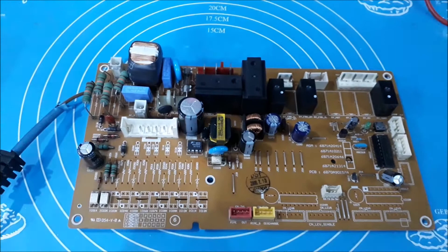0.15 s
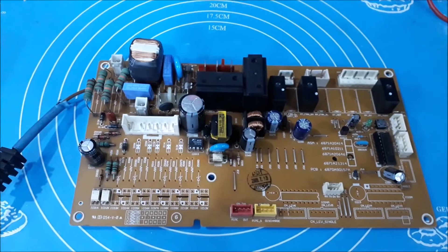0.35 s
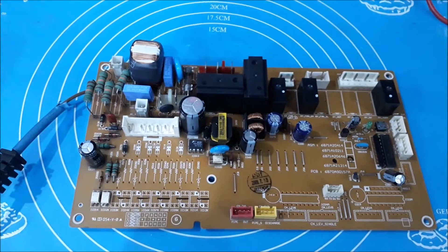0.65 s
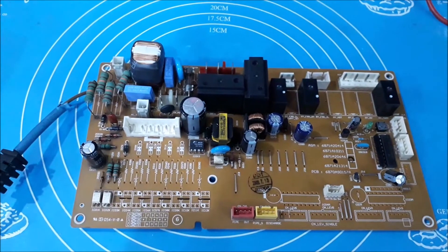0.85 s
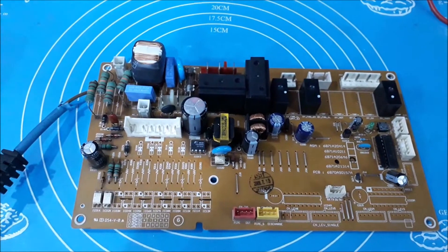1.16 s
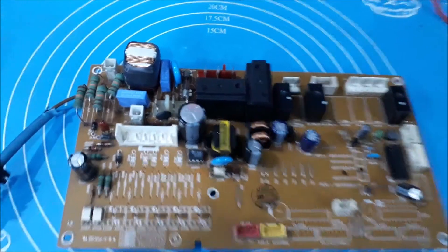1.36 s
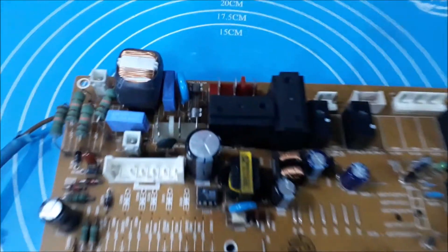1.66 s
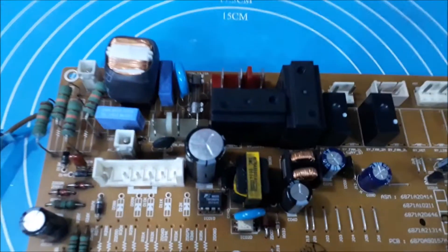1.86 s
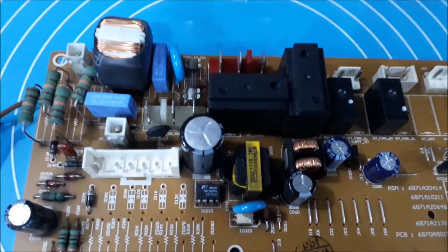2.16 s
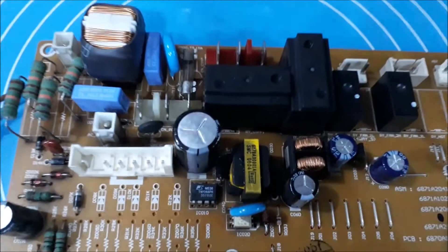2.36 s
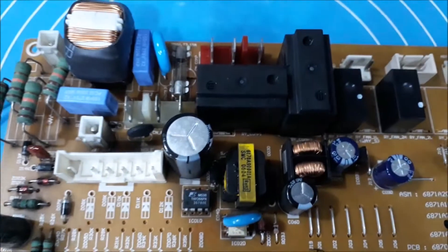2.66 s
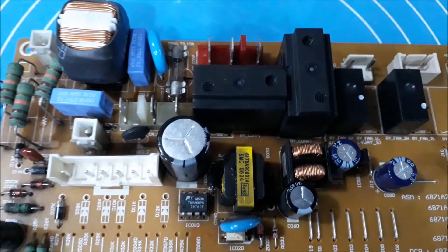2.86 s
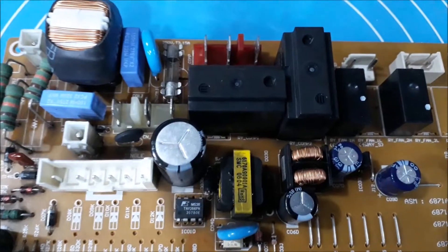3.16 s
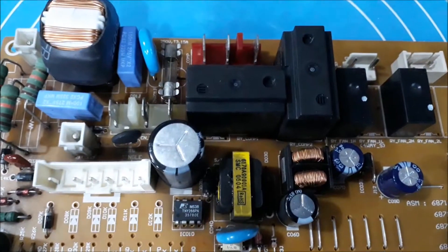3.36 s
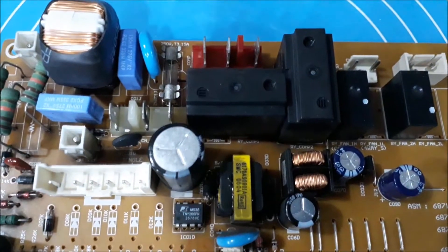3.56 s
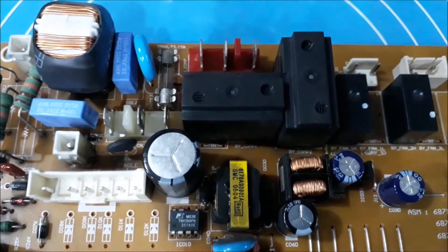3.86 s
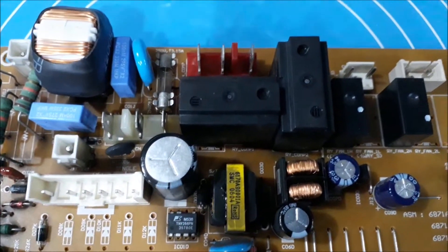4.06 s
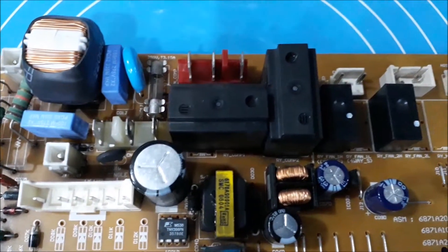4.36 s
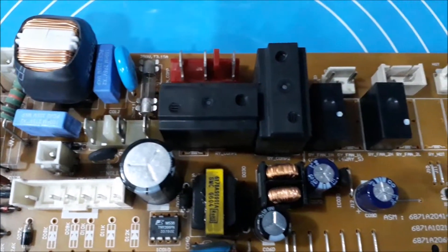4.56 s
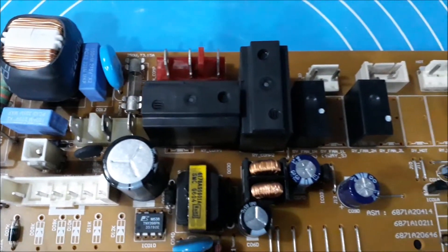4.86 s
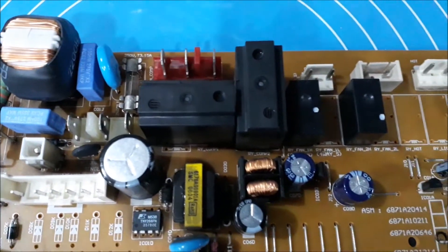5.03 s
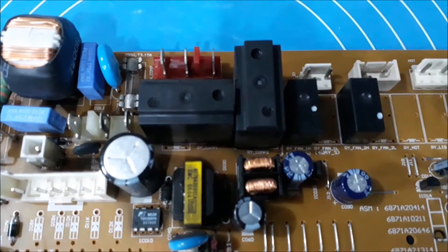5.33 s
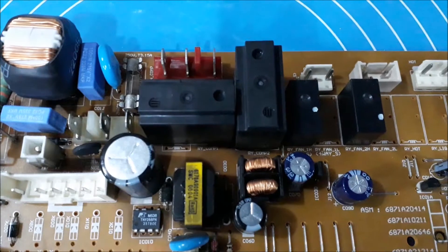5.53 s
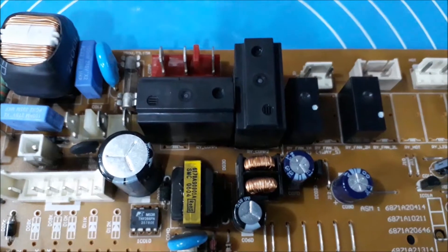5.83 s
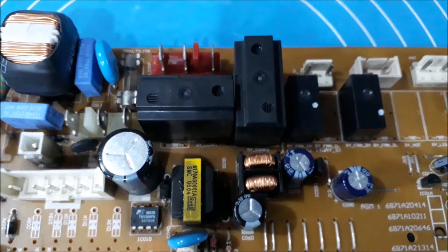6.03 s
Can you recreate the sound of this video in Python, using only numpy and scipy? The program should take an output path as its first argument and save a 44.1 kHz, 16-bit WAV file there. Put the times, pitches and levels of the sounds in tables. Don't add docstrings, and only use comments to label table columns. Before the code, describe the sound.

A relay on a circuit board clicks at a steady pace, soft clacks mixed with sharp hard ones, over faint hum, whine and room air.

```python
import sys
import numpy as np
from scipy import signal
from scipy.fft import rfft, irfft
from scipy.io import wavfile
from scipy.ndimage import uniform_filter1d

SR = 44100
rng = np.random.default_rng(int(sys.argv[2]) if len(sys.argv) > 2 else 0)


def generate_wav(signal):
    frames = np.transpose(np.atleast_2d(signal))
    scaled = np.clip(frames, -1, 1) * 32767
    pcm = np.round(scaled).astype(np.int16)
    wavfile.write(sys.argv[1], SR, pcm)


def makeup_ratio(level_db):
    decades = np.asarray(level_db, float) / 20
    return 10 ** decades


N = 272979


def level(x, db):
    return x * makeup_ratio(db) / np.sqrt(np.mean(x ** 2))


def colour(x, points):
    hz, db = np.transpose(points)
    f = np.maximum(np.fft.rfftfreq(len(x), 1 / SR), 1)
    return irfft(rfft(x) * makeup_ratio(np.interp(np.log(f), np.log(hz), db)), len(x))


def curve(rows):
    s, value = np.transpose(rows)
    return np.interp(np.arange(N) / SR, s, value, left=-140, right=-140)


def fade(t, t60):
    return np.exp(-np.log(1000) * t / t60)


def walk(rate):
    k = int(SR / rate)
    held = np.repeat(rng.standard_normal(N // k + 1), k)
    return 1.36 * uniform_filter1d(uniform_filter1d(held, k), k)[:N]


def filtered(x, hz, kind):
    return signal.sosfilt(signal.butter(2, hz, kind, fs=SR, output="sos"), x)


def add(out, s, x, db):
    i = int(s * SR)
    x = (x * makeup_ratio(db) / np.abs(x).max())[max(-i, 0):N - i]
    out[max(i, 0):max(i, 0) + len(x)] += x


def short_rings(t, swell, modes):
    hz, db, t60 = np.transpose(modes)[:, :, None]
    short, first = t[:SR // 10], t[:SR // 50]
    kicks = rng.standard_normal(len(t))
    bounces = (kicks * np.abs(kicks) * swell)[None, :len(first)]
    detune, phase, share = rng.standard_normal((3, len(hz), 1))
    tone = np.sin(2 * np.pi * (hz * (1 + 0.0042 * detune) * short + phase))
    ring = fade(short, t60)
    push = signal.fftconvolve(ring, np.abs(bounces) * fade(first, 0.018), axes=1)[:, :len(short)]
    apart = signal.fftconvolve(ring * tone, bounces, axes=1)[:, :len(short)]
    rings = apart + 0.5 * (hz < 5500) * push * tone
    rings *= makeup_ratio(db + 1.06 * share) / np.abs(rings).max(axis=1, keepdims=True)
    return rings.sum(axis=0)


def long_ring(t, hz, level_db, t60, rise_ms):
    ring_end_s = 0.16
    swing = fade(t, t60) * (1 - np.exp(-t * 1000 / rise_ms)) * np.exp(-(t / ring_end_s) ** 4)
    rattle = uniform_filter1d(uniform_filter1d(rng.standard_normal(len(t)), size=250), size=250)
    rattle *= min(.3 + hz / 3500, 1)
    return makeup_ratio(level_db + 60 * rattle) * swing * np.sin(2 * np.pi * hz * t + 6 * rattle[::-1])


# pitch_hz [Hz], level_db [dB per Hz]
CRACK_COLOUR = [(600, -49), (1150, -24), (1500, -2.5), (2500, -4), (3700, 1), (5300, -6.5), (6800, -8),
                (8200, -5.5), (8750, 2.5), (9500, -4), (11200, -3), (12600, -8), (14500, -6.5),
                (16400, -19.5)]


def strikes(events, modes, long_hz, long_modes, long_db, crack_db, crack_t60,
            tail_db, tail_t60, lead_db, treble_db):
    out, t = np.zeros(N), np.arange(SR // 3) / SR
    for s, peak_db, bounce_ms, *ring_db in events:
        swell = np.minimum(t / 0.00059, 1) * np.exp(-(t / (bounce_ms / 1000)) ** 3)
        decay = makeup_ratio(crack_db) * (swell + fade(t, crack_t60)) + makeup_ratio(tail_db) * fade(t, tail_t60)
        crack = level(colour(rng.standard_normal(len(t)), CRACK_COLOUR), 0)
        hit = crack * decay * np.minimum(t / 0.0016, 1)
        add(hit, 0, short_rings(t, swell, modes), 0)
        hit = hit + (makeup_ratio(treble_db) - 1) * filtered(hit, 6000, "high")
        hit = signal.sosfilt(signal.cheby2(4, 20, 1050, "high", fs=SR, output="sos"), hit)
        hit = hit * makeup_ratio(-12) / np.sqrt(np.mean(hit[:SR // 100] ** 2))
        own_db = ring_db + len(long_hz) * [long_db]
        for hz, (mode_db, t60, rise_ms), extra_db in zip(long_hz, long_modes, own_db):
            hit += long_ring(t, hz, mode_db + extra_db, t60, rise_ms)
        peak_db += 20 * np.log10(np.abs(hit).max())
        add(out, s, hit, peak_db)
        add(out, s - .002, hit, peak_db + lead_db)
    return out


BOARD_PITCHES = (2536, 2340, 1825, 581, 350, 780)
# level_db [dB], t60_s [s], rise_ms [ms]
BOARD_RINGS = [(2, 0.14, 18.5), (5.5, 0.11, 4.6), (-21, 0.09, 3), (-34.5, 0.24, 14.6), (-35.5, 0.068, 4.5),
               (-37.5, 0.043, 0.43)]
# start_s [s], peak_db [dB], bounce_ms [ms], first_ring_db [dB], second_ring_db [dB]
SLAM_TIMES = [
    (2.5535, -12.5, 6.6, -18, -37),
    (3.3875, -12.5, 5.6, -21, -30),
    (4.2243, -12.5, 8, -26, -31),
    (5.898, -12.5, 5.5, -17.5, -25),
]
# pitch_hz [Hz], level_db [dB], t60_s [s]
SLAM_PARTS = [(1400, -10, .025), (1825, -1.5, .031), (3130, -3, .024), (3640, 0, .02), (4330, -2, .035),
              (4790, -4, .028), (6020, -4, .028), (7620, -9, .03), (8380, -6, .035), (8730, -3.5, .05),
              (9000, -5, .03), (10250, -3, .025), (11100, -6.5, .025), (11500, -6, .025), (13600, -10, .03),
              (14100, -7, .03), (14700, -6, .025)]


def slam():
    return strikes(SLAM_TIMES, SLAM_PARTS, BOARD_PITCHES, BOARD_RINGS, 0.33, crack_db=-14.0, crack_t60=0.045,
                   tail_db=-19.5, tail_t60=.17, lead_db=-20, treble_db=1.3)


# start_s [s], peak_db [dB]
CONTACT_TIMES = [
    (2.537, -19),
    (3.3774, -19.5),
    (4.212, -20),
    (5.8799, -20.5),
]
# pitch_hz [Hz], level_db [dB], t60_s [s]
CONTACT_PARTS = [(1800, -13, .03), (3300, -11, .025), (3600, -15, .03), (4355, 0, .034), (4780, -8, .03),
                 (6000, -12, .02), (7900, -9, .02), (8700, -5, .02), (10200, -8, .02), (11200, -3, .018),
                 (14000, -10, .015)]


def contact():
    touches = [(s, db, 2.4) for s, db in CONTACT_TIMES]
    return strikes(touches, CONTACT_PARTS, BOARD_PITCHES, BOARD_RINGS, -29, crack_db=-22.5, crack_t60=0.035,
                   tail_db=-21, tail_t60=0.098, lead_db=-19, treble_db=4.0)


# start_s [s], peak_db [dB], bounce_ms [ms], first_ring_db [dB], second_ring_db [dB]
HALF_TIMES = [
    (.0403, -27.5, 8.2, -14, -31),
    (.8765, -29, 5.5, -18.5, -27),
    (1.7116, -25.5, 5.5, -23, -34),
    (5.0562, -35.5, 8, -10, -24),
]
# pitch_hz [Hz], level_db [dB], t60_s [s]
HALF_PARTS = [(1570, -6, 0.036), (2330, -5.5, 0.075), (3050, -2.5, 0.036), (3290, -4, 0.07),
              (3580, 1.5, .035), (4580, -12, 0.058), (5075, -3, 0.035), (6035, 2.5, 0.03),
              (7070, -1.5, 0.051), (8730, 1, 0.035), (9350, -4, 0.03), (10460, -2, 0.033), (11600, 1, 0.03),
              (14300, -12, 0.053), (14700, -30, 0.018)]
HALF_PITCHES = (1740, 2560)
# level_db [dB], t60_s [s], rise_ms [ms]
HALF_LONG_RINGS = [(0, 0.061, 1.5), (0, .12, 5)]


def half_pull():
    return strikes(HALF_TIMES, HALF_PARTS, HALF_PITCHES, HALF_LONG_RINGS, -8, crack_db=-13.5, crack_t60=0.068,
                   tail_db=-23, tail_t60=0.2, lead_db=-38, treble_db=1.1)


# peak_db [dB], first_ring_db [dB], second_ring_db [dB]
TICK_LEVELS = [
    (-47, -8, -9),
    (-45.5, -15.5, -9),
    (-46.5, -21, -12.5),
    (-46.5, -14, -17),
    (-45.5, -12, -26),
    (-46.5, -11, -1),
    (-58, -18, -2),
    (-51.5, -2, -10),
]
# pitch_hz [Hz], level_db [dB], t60_s [s]
TICK_PARTS = [(1980, -6, 0.022), (4270, -11, 0.025), (6090, -4, .02), (8500, -1, 0.023),
              (10800, 2.5, 0.017), (11570, -14, 0.027), (14000, -10, .015)]
FAR_PITCHES = (1760, 2980)
# level_db [dB], t60_s [s], rise_ms [ms]
FAR_RINGS = [(0, 0.12, 2.7), (0, .12, 1.4)]
NEAR_PITCHES = (1760, 3800)
# level_db [dB], t60_s [s], rise_ms [ms]
NEAR_RINGS = [(0, 0.1, 2), (0, 0.021, 1.2)]


def tick():
    first_s, cycle_s, bounce_ms = -.00575, .83625, 1.7
    ticks = [(first_s + k * cycle_s, db, bounce_ms, *rings) for k, (db, *rings) in enumerate(TICK_LEVELS)]
    near = strikes(ticks[4:], TICK_PARTS, NEAR_PITCHES, NEAR_RINGS, -40, crack_db=-22.0, crack_t60=.02,
                   tail_db=-11, tail_t60=0.083, lead_db=-46, treble_db=-5)
    far = strikes(ticks[:4], TICK_PARTS, FAR_PITCHES, FAR_RINGS, -40, crack_db=-17, crack_t60=.02,
                  tail_db=-14, tail_t60=0.11, lead_db=-38, treble_db=3.5)
    return near + far


def relay():
    return tick() + contact() + slam() + half_pull()


def peel(start_s, hard_s, end_s, db):
    t = np.arange(N) / SR
    rise_db, ease_db = 13, 11
    held = np.interp(t, [start_s - .03, start_s, hard_s, end_s], [-30 - rise_db, -rise_db, 0, -ease_db], left=-90)
    settling = -12.5 - 46.5 * (t - end_s)
    return db + np.where(t < end_s, held, settling)


# start_s [s], hardest_s [s], let_go_s [s], rustle_db [dB at its hardest]
SKIN_PEELS = [
    (1.224, 1.385, 1.44, -59),
    (1.642, 1.665, 1.7, -75),
]
# start_s [s], peak_db [dB]
GRIP_SNAPS = [(0.3267, -43.5), (1.1752, -60), (1.2415, -52), (1.288, -44), (1.2913, -45), (1.303, -45),
              (1.334, -42), (1.344, -41), (1.3682, -36), (1.3768, -36.5), (1.3903, -41), (1.393, -43.5),
              (1.428, -43), (1.4356, -42), (1.5057, -42.5), (1.6482, -51), (1.6524, -50), (1.659, -39.5),
              (1.8294, -51), (2.044, -61), (2.1175, -50.5), (2.4964, -56), (2.797, -48.5), (3.1813, -50.5),
              (3.2013, -53), (3.8344, -59), (4.0003, -51), (4.6398, -54), (5.5864, -55), (5.7598, -56)]
# start_s [s], peak_db [dB], pitch_hz [Hz], t60_s [s]
FINGER_KNOCK = [
    (2.418, -47, 990, 0.022),
]


def grip():
    out, t = np.zeros(N), np.arange(SR // 50) / SR
    start_s, _, end_s, _ = SKIN_PEELS[0]
    small_s = rng.uniform(start_s, end_s, size=int(130 * .22))
    rustle_db = peel(*SKIN_PEELS[0])[(small_s * SR).astype(int)]
    small_db = rustle_db + 12 + 3.5 * rng.standard_normal(len(small_s))
    snap_hz = 9070
    for s, peak_db in GRIP_SNAPS + list(zip(small_s, small_db)):
        burst = (rng.standard_normal(len(t)) + 4 * (t == 0)) * (fade(t, .003) + .08 * fade(t, .012))
        snap = filtered(burst, [snap_hz * 0.71, min(snap_hz * 1.7, 20000)], "band")
        shell_ring = signal.lfilter(*signal.iirpeak(8800, 9, fs=SR), snap)
        add(out, s, snap + 1.9 * shell_ring, peak_db + 2.0)
    dense = rng.standard_normal(N) * np.clip(rng.exponential(size=N), 0, 3.5) ** 2
    shell = [(3500, -30), (6500, 0.5), (8200, -5), (8800, 3), (9500, 2), (15500, -9), (16500, -5)]
    peeling = sum(makeup_ratio(peel(*p)) for p in SKIN_PEELS)
    out += level(colour(dense, shell), 0) * peeling * makeup_ratio(2 * walk(150))
    for s, peak_db, hz, t60 in FINGER_KNOCK:
        tap = filtered(rng.standard_normal(len(t)), 6000, "low")
        knock = fade(t, t60) * np.sin(2 * np.pi * hz * t) + 0.77 * fade(t, .006) * tap
        add(out, s - .001, knock, peak_db + 3)
    return out


# time_s [s], level_db [dB]
WHINE_LEVELS = [
    (0, -82),
    (1.45, -82),
    (1.75, -90),
    (2.05, -91),
    (2.5, -80.5),
    (3.6, -84),
    (5.0, -76.5),
    (6.19, -77),
]


def supply():
    whine_hz = 11780
    phase = 2 * np.pi * np.cumsum(whine_hz + 4 * walk(20)) / SR
    return np.sqrt(2) * makeup_ratio(curve(WHINE_LEVELS) + .7 * walk(25)) * np.sin(phase)


# pitch_hz [Hz], width_hz [Hz], level_db [dB]
HUM_BANDS = [(60, 7.6, -80.5), (115.8, 6.8, -81.5), (172, 7.2, -97), (252, 37, -74.5), (356.2, 6.7, -79),
             (2030, 3.2, -83)]
# pitch_hz [Hz], peak_db [dB]
HUM_TONES = [(118, -78), (238, -71), (2042, -83)]


def mains_hum():
    hum = np.zeros(N)
    for hz, width_hz, db in HUM_BANDS:
        band = signal.lfilter(*signal.iirpeak(hz, hz / width_hz, fs=SR), rng.standard_normal(N))
        hum += level(band, db)
    for hz, db in HUM_TONES:
        phase = 2 * np.pi * np.cumsum(hz + 1.539 * walk(4)) / SR
        hum += makeup_ratio(db + 1.74 * walk(9)) * np.sin(phase)
    return hum


# loudest_s [s], level_db [dB], swell_s [s], fade_s [s]
VEHICLES = [
    (1.5, -66.5, 0.32, 0.43),
    (2.5, -74, 0.095, 0.44),
    (5.8, -78.5, 0.26, 0.26),
]


def street():
    t = np.arange(N) / SR
    loudness = makeup_ratio(-84)
    for s, db, swell_s, fade_s in VEHICLES:
        loudness = loudness + makeup_ratio(db) * np.exp(-((t - s) / np.where(t < s, swell_s, fade_s)) ** 2)
    tyres = [(150, -25), (300, 3.5), (900, -10), (1700, -5.5), (2150, 2.5), (2700, -3.5), (3300, -7.5),
             (5000, -36.5), (9000, -43.5)]
    return level(colour(rng.standard_normal(N), tyres), 0) * loudness


# pitch_hz [Hz], level_db [dB per Hz]
AIR_COLOUR = [(15, -45), (25, -8.5), (60, -15.5), (150, -10.5), (400, -13), (900, -16), (2100, -18),
              (3300, -24.5), (5500, -29.5), (9750, -34.5), (12500, -31), (15500, -32)]
# pitch_hz [Hz], side_minus_mid_db [dB]
AIR_WIDTH = [(60, -16), (110, -18.5), (200, -16.5), (380, -15.5), (700, -13), (1290, -12.5), (2380, -12),
             (4400, -9), (8120, -12.5), (15000, -9.5)]


def shop_air():
    air_db = -63.5
    mid = level(colour(rng.standard_normal(N), AIR_COLOUR), air_db - 2) * makeup_ratio(1.1 * walk(3.17))
    other = level(colour(rng.standard_normal(N), AIR_COLOUR), air_db)
    return mid, colour(other, [(15, -35.0), (35, -36.0)] + AIR_WIDTH)


def scene():
    near = relay() + grip() + supply()
    air, side = shop_air()
    mid = near + mains_hum() + street() + air
    return np.array([mid + side, mid - side])


def top_cut(x):
    return signal.sosfilt(signal.butter(12, 16480, fs=SR, output="sos"), x)


def record(dry):
    top_hz = 15750
    treble_loss = [(top_hz, 0), (top_hz + 150, -30), (16500, -40)]
    thin = np.array([colour(channel, treble_loss) for channel in dry])
    return top_cut(thin - .0004)


dry = scene()
out = record(dry)
generate_wav(out)
```